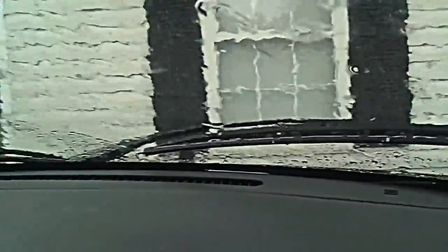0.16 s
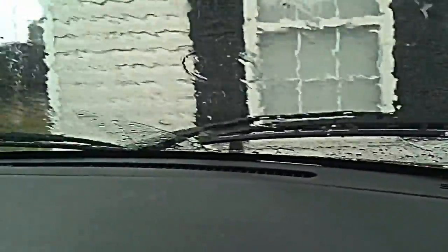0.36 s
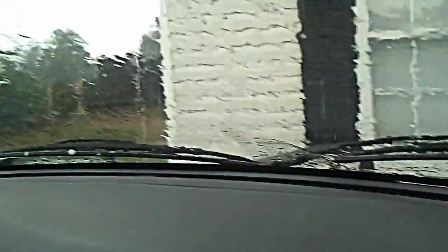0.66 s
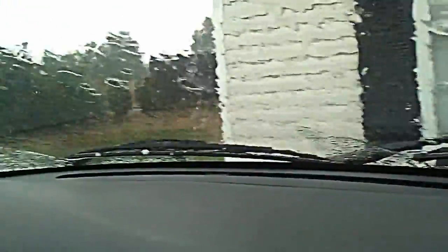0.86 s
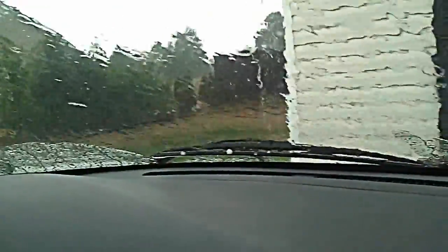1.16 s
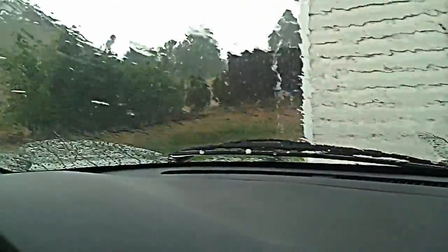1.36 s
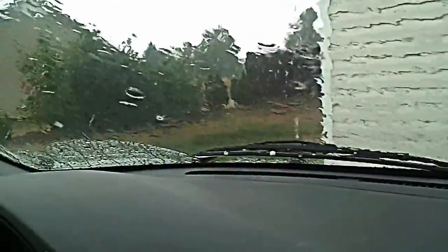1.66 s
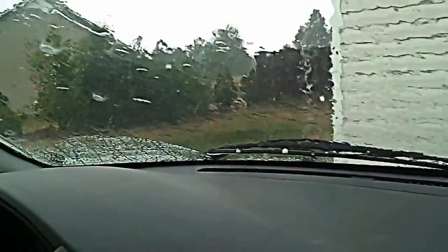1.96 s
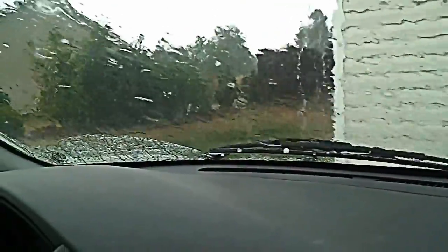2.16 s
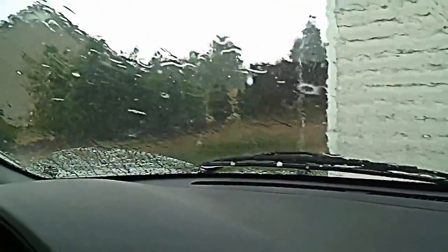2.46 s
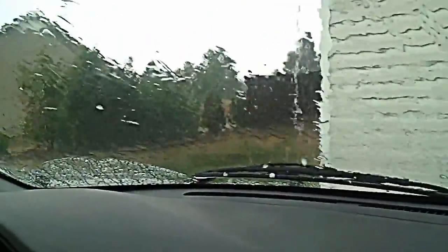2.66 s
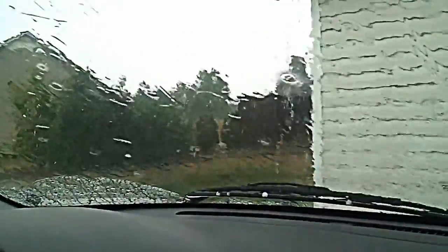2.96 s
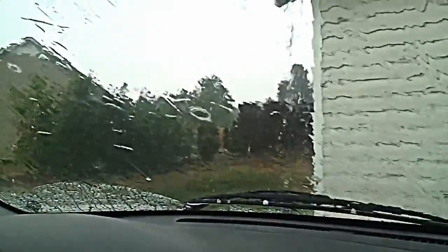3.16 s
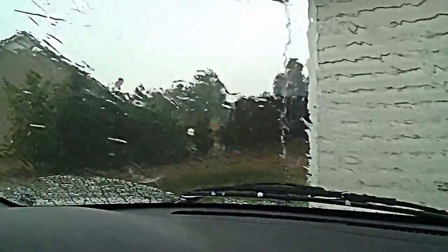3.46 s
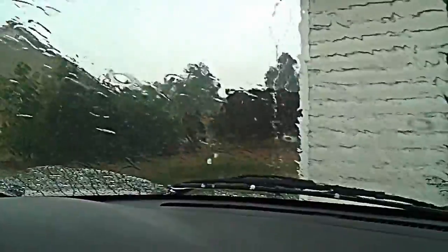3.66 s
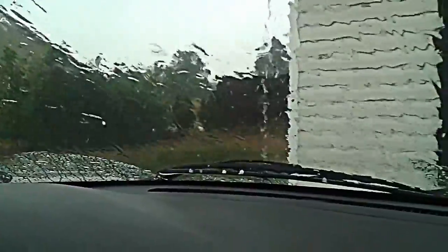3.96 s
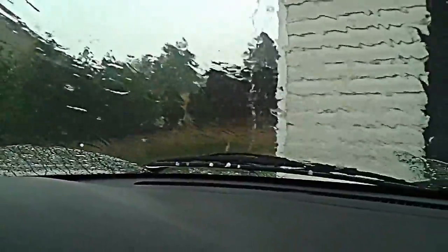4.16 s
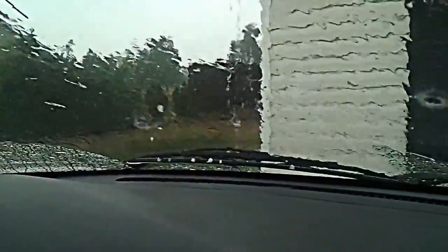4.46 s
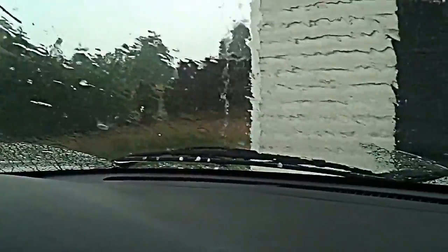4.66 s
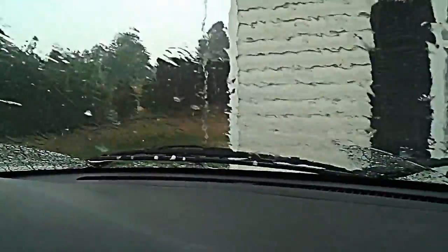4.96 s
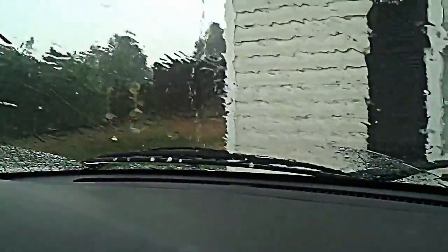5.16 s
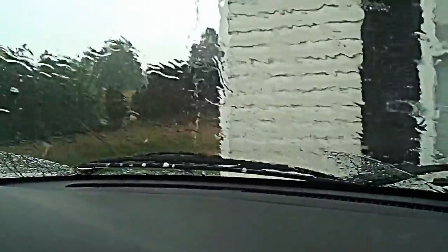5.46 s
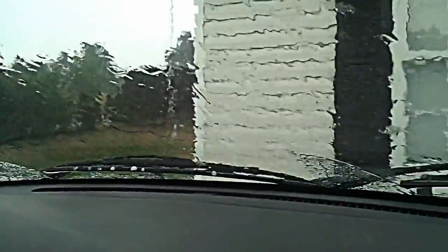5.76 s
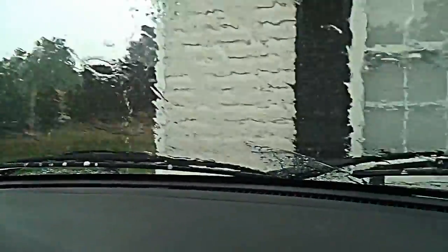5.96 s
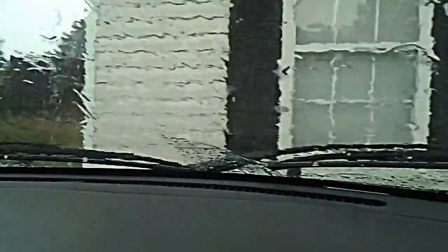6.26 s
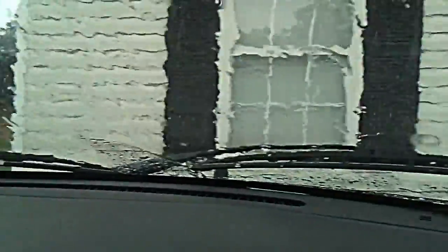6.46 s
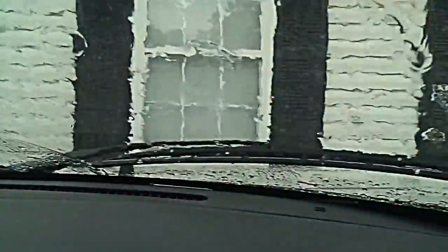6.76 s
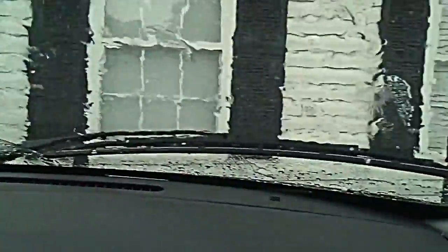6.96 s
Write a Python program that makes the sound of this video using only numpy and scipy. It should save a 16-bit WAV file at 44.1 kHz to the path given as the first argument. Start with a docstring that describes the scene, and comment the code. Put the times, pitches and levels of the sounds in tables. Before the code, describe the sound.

From start to finish, about seven seconds, heavy rain drums on the roof of a parked car and hisses on the windshield, with tiny ice grains ticking on the glass. The level swells and eases only slightly. Hailstones land on top of this at irregular intervals, several a second. Roof hits are muffled knocks with a short metal ring and a dull thump in the cabin; windshield hits are brief, brighter cracks. Strong roof blows come at about 0.2, 0.5, 1.7 and 3.6 seconds, with a quick cluster between 5.2 and 5.7 and the heaviest at 6.7. Sharp glass cracks stand out near 2.0, 2.9, 4.5 and 6.2 seconds. Everything is heard from one spot inside the closed cabin, close and boxy, through a microphone with limited treble that overloads briefly on the hardest impacts.

```python
"""Inside a parked car, in a hailstorm. Hailstones thud on the steel roof, muffled by its lining, and crack
sharply on the windshield. Heavy rain patters and hisses on both. Each impact is a bending wave, a panel ring
and a dull cabin tail; the hardest blows clip."""
import sys
import numpy as np
from scipy import signal
from scipy.fft import rfft, irfft, next_fast_len
from scipy.io import wavfile

SR = 44100
rng = np.random.default_rng(int(sys.argv[2]) if len(sys.argv) > 2 else 0)


def store_pcm(level_fs):
    """Save levels as 16-bit WAV."""
    pcm = np.round(np.clip(level_fs, -1, 1) * 32767).astype(np.int16)
    wavfile.write(sys.argv[1], SR, np.atleast_2d(pcm).T)


N = 313110

# edges of bands that decay at their own rates: (frequency [Hz])
EDGES_HZ = [20, 130, 330, 600, 1000, 1600, 2400, 3400, 4800, 6300, 9000]
BAND_HZ = np.sqrt(np.multiply(EDGES_HZ[:-1], EDGES_HZ[1:]))[:, None]
BAND_OCT = np.log2(np.maximum(BAND_HZ, 200) / 1000)
BLOW_LEN = SR // 4
AGE_S = np.arange(BLOW_LEN) / SR
BIN_HZ = np.arange(BLOW_LEN // 2 + 1) * SR / BLOW_LEN


def roof_hail(gain_db=-2.0, thump_s=0.003, t60_s=0.12, t60_doubling_db=38):
    """Stones on the lined steel roof: heavy ones ring longer; a flexing panel thumps the cabin air."""
    # (time [s], level [dB], tilt [dB/oct], swell [s], knock [Hz], panel flex [0-1])
    big_stones = [(0.001, 2, 1.8, 0.0019, 680, 1), (0.023, -0.5, 0, 0.011, 710, 0),
                  (0.040, -2.5, -4, 0.0021, 670, 0.37), (0.084, -1.5, 0, 0.0079, 3500, 0.06),
                  (0.156, 5.5, 3.5, 0.0022, 740, 1), (0.197, 1.5, -1, 0.0044, 240, .3),
                  (0.405, -2, 1, 0.0016, 2100, 0), (0.445, -3, 0.5, 0.0054, 420, 0),
                  (0.537, 7.5, 0.95, .012, 230, 1), (0.743, 0, -2, 0.0042, 1160, 0),
                  (0.942, -1, 1, 0.0038, 440, 0.1), (1.118, -4, 3.5, 0.01, 654, 0.1),
                  (1.542, 3.5, 2.3, .017, 1100, 0.33), (1.642, -7.5, 5.5, 0.012, 1950, 0),
                  (1.671, 3, 3, 0.0045, 2040, 0.18), (1.692, 8.5, 0.6, .011, 766, 0),
                  (1.839, -12.5, 7, 0.0069, 750, 0), (1.900, 0.5, -1, 0.011, 430, 0.2),
                  (1.944, 2, 2.5, 0.0086, 368, .1), (2.115, -1, 3, 0.0089, 900, 0),
                  (2.498, -4, 1, 0.013, 330, 0.3), (2.637, 0, 2, 0.017, 330, 0.05),
                  (2.781, -3, 1, 0.0023, 420, 0.1), (2.793, 3, 4.5, 0.0013, 400, .3),
                  (2.912, 3, 2.5, 0.0054, 403, 0.84), (3.143, 3.5, 4, 0.0066, 736, 0.7),
                  (3.356, -6.5, 1.5, 0.0043, 3630, 0.06), (3.440, -6.5, -3.5, 0.0048, 1420, 0.03),
                  (3.491, -1, 0, 0.017, 403, .4), (3.585, 0, 3.5, 0.0067, 467, 0.4),
                  (3.645, 7, 2, 0.0028, 430, 0.8), (3.848, -6, 4.5, 0.0044, 2400, 0.6),
                  (3.862, 3, -0.9, .004, 386, 0), (4.067, -3, 3, 0.0049, 363, 0.1),
                  (4.137, -6, 0, 0.0053, 680, 0.3), (4.258, -5, 4.5, 0.004, 494, 0),
                  (4.553, 6, 2, .010, 330, 0.4), (4.629, -7, -3.5, 0.0018, 380, 0),
                  (4.763, -5.5, -3, 0.0067, 960, 0), (5.041, -7, 3.5, 0.012, 2400, .4),
                  (5.200, 7, 3, .005, 510, 0), (5.230, 4, 3, .003, 416, 0), (5.296, 3, 2.5, .015, 384, 0.4),
                  (5.342, 6.5, 2.5, .005, 440, .7), (5.723, 8.5, 2.45, 0.0089, 1150, 0.2),
                  (5.771, -1, -2.5, 0.01, 400, 0), (5.805, -7, 6, 0.0057, 330, 0.1),
                  (5.880, -6, 0.5, 0.014, 1600, 0.03), (6.017, -4.5, -2, .012, 1070, 0.04),
                  (6.093, -3, 0.5, 0.0089, 330, 0), (6.285, 4.5, 0.9, .010, 1480, 0.5),
                  (6.363, -4.5, 0, 0.0073, 2500, 0.12), (6.483, -6.5, 2.5, 0.0075, 410, 0.2),
                  (6.576, -7, 0.5, .017, 2880, 0), (6.661, -3.5, -1, 0.022, 670, 0),
                  (6.746, 12.5, 3, 0.0057, 600, 0.3)]
    # roof response in the cabin: (frequency [Hz], gain [dB])
    roof_tone = [(30, -35), (80, -32), (125, -11.5), (175, -6.5), (290, -10), (400, 0.5), (720, -4.5),
                 (1100, -9), (1400, -11.5), (1900, -9), (2600, -14), (3500, -15.5), (5600, -22.5),
                 (8000, -27)]
    # pressure follows the dent's acceleration: one push, one pull
    thump = AGE_S / thump_s * (2 - AGE_S / thump_s) * np.exp(-AGE_S / thump_s)
    out = np.zeros(N)
    for time_s, db, tilt_db, swell_s, knock_hz, flex in big_stones + small_stones():
        ring_s = t60_s * 2 ** (db / t60_doubling_db)
        ring = blow(db + tilt_db * BAND_OCT, swell_s, ring_s, first_share=0.06, travel_s=0.000331)
        add(out, knock(ring, knock_hz) + flex * from_db(db) * thump, time_s)
    return from_db(gain_db) * colour(out, roof_tone)


def small_stones(count=100, per_s=6, swell_s=0.0087, low_hz=330, high_hz=1990):
    """Rows of random roof hits: sizes follow the storm, too light to flex the panel."""
    times_s = np.cumsum(rng.uniform(0.2, 1.8, count)) / per_s
    size, hardness = rng.standard_normal((count, 2)).T
    levels_db = -10.5 + downpour_db(times_s) + 3.5 * size
    tilts_db = 2.5 + 1.5 * hardness
    knocks_hz = low_hz * (high_hz / low_hz) ** rng.random(count)
    stones = zip(times_s, levels_db, tilts_db, knocks_hz)
    return [(s, db, tilt_db, swell_s, hz, 0) for s, db, tilt_db, hz in stones if s < (N - 1) / SR]


def knock(x, hz, lift_db=7.5, q=4):
    """The mode under the point of impact rings above the others."""
    mode = signal.lfilter(*signal.iirpeak(hz, q, fs=SR), x)
    return x + (from_db(lift_db) - 1) * mode


def glass_hail(ping_width_oct=0.52, t60_s=0.057, t60_doubling_db=25):
    """Stones on the bare windshield: short cracks, each with a ping set by size and landing place."""
    # (time [s], level [dB], tilt [dB/oct], swell [s], ping [Hz], ping lift [dB])
    stones = [(0.288, -1.5, 1, .0005, 3860, -6.5), (1.005, -7.5, 2.2, .001, 2960, -4),
              (1.987, 7, 0.5, .004, 8650, 13), (2.033, -3.5, 1, .0015, 3030, -1),
              (2.355, -4, 2.5, .0008, 3120, -8), (2.460, 0.5, 1.5, 0.00066, 4400, 6),
              (2.609, -7.5, 6, .0007, 2270, 8.5), (2.756, -15, 5, 0.00095, 3800, -2),
              (2.856, -22, 6, 0.0011, 5370, 2.5), (2.931, -4.5, -0.5, .0015, 7380, 20),
              (2.939, 3.5, 1.3, .001, 1820, 4.5), (4.114, -20, 1.5, 0.0055, 3830, 12.5),
              (4.532, 8, 0.6, .003, 5850, 6.5), (4.852, -11.5, 2.5, .001, 2960, -9),
              (4.98, -8.5, 7, 0.0053, 3060, 8), (5.413, -15.5, 4.5, .001, 5240, -2),
              (5.495, 0.5, 4.5, 0.0013, 7700, 1), (5.942, -6, -1.5, 0.0031, 2490, 7),
              (6.196, 2.5, 1.9, .002, 3200, 1.5), (6.796, -7.5, 3.5, .001, 4560, -1)]
    # windshield response in the cabin: (frequency [Hz], gain [dB])
    glass_tone = [(30, -37.5), (100, -9), (170, -9.5), (400, -1.4), (800, -7), (1400, -9.5), (1900, -6.5),
                  (2600, -11), (3500, -7), (4800, -11), (6000, -17), (8000, -24)]
    out = np.zeros(N)
    for time_s, db, tilt_db, swell_s, ping_hz, ping_db in stones:
        ping_shape = np.exp(-(np.log2(BAND_HZ / ping_hz) / ping_width_oct) ** 2)
        bands_db = db + tilt_db * BAND_OCT + ping_db * ping_shape
        ring_s = t60_s * 2 ** (db / t60_doubling_db)
        crack = blow(bands_db, swell_s, ring_s, first_share=0.23, travel_s=0.0004,
                     tail_db=-14.5, tail_t60_s=0.18)
        add(out, crack, time_s)
    return colour(out, glass_tone)


def rain(gain_db=-21.5, swing_share=0.51, patter_db=-4.0, spray_db=-13, tick_db=-16):
    """Big drops drum on the roof, fine spray hisses, ice grains tick on the glass."""
    # responses to drops and to spray: (frequency [Hz], gain [dB])
    patter_tone = [(30, -57.5), (75, -28), (120, -8.5), (172, -4.5), (270, -6.5), (410, 3.5), (750, -1.5),
                   (1150, -5), (1400, -7.5), (1900, -5.5), (2700, -14), (3500, -18), (5500, -25.5),
                   (8000, -27.5)]
    spray_tone = [(300, -13.5), (1200, -7.5), (1900, -4), (2700, -4.5), (3600, 1.5), (5500, -8.5),
                  (8000, -13.5)]
    drops = shower(per_s=400, spread_db=4.0, swell_s=0.00287, t60_s=0.13, first_share=0.083, spots=10)
    spray = shower(per_s=1900, spread_db=7.0, swell_s=0.0015, t60_s=0.016, first_share=0.12, spots=4)
    ticks = shower(per_s=30, spread_db=5, swell_s=0.0005, t60_s=0.012, first_share=0.6, spots=8)
    patter = from_db(patter_db) * rms_one(colour(drops, patter_tone))
    hiss = colour(from_db(spray_db) * rms_one(spray) + from_db(tick_db) * rms_one(ticks), spray_tone)
    return from_db(gain_db + swing_share * downpour_db(np.arange(N) / SR)) * (patter + hiss)


def shower(per_s, spread_db, swell_s, t60_s, first_share, spots):
    """Impacts of random size and time on spots from dull to bright, each with its own ring."""
    out = np.zeros(N)
    for tilt_db in np.linspace(-2, 2, spots):
        sizes = from_db(spread_db * np.clip(rng.standard_normal(N), -2, 2))
        signs = rng.choice([-1, 1], N)
        landings = rng.random(N) < per_s / spots / SR
        ring = blow(tilt_db * BAND_OCT, swell_s, t60_s, first_share, travel_s=0.000416)
        out += signal.oaconvolve(sizes * signs * landings, rms_one(ring))[:N]
    return out


def downpour_db(time_s):
    """Storm strength about its mean; it swells and eases a little."""
    # (time [s], level [dB])
    strength = [(0.0, -28.5), (0.28, -31), (0.79, -34), (0.99, -30), (1.4, -31.5), (1.94, -30), (2.33, -31),
                (2.51, -29.5), (3.74, -32.5), (5.36, -30), (5.61, -32.5), (6.19, -28), (6.62, -30.5),
                (7.1, -29)]
    times_s, db = np.transpose(strength)
    return np.interp(time_s, times_s, db - db.mean())


def blow(bands_db, swell_s, t60_s, first_share, travel_s,
         damping=0.3, tail_db=-15, tail_tilt_db=-4, tail_t60_s=0.37):
    """One impact: first wave, swell as it spreads over the panel, panel ring, dull cabin tail."""
    swell = np.minimum(AGE_S / swell_s, 1)
    decay_s = np.maximum(AGE_S - swell_s, 0)
    panel = np.exp(-np.log(1000) * decay_s / t60_s * 2 ** (damping * BAND_OCT))
    tail = from_db(tail_db + tail_tilt_db * BAND_OCT) * np.exp(-np.log(1000) * decay_s / tail_t60_s)
    gains = from_db(bands_db)
    ring = dense_modes(gains * swell * np.sqrt((1 - first_share) * panel ** 2 + tail ** 2))
    panel_energy = np.sum((swell * panel) ** 2, axis=1, keepdims=True)
    first = bending_wave(gains * np.sqrt(first_share * panel_energy), travel_s)
    return ring + np.pad(first, (int(swell_s * SR / 2), 0))[:BLOW_LEN]


def bending_wave(gains, travel_s):
    """First wave from the impact: speed grows as the root of frequency, so the treble leads."""
    delay_s = travel_s * np.sqrt(BAND_HZ[-1] / np.maximum(BIN_HZ, BAND_HZ[1]))
    phase = 2 * np.pi * np.cumsum(delay_s) * SR / BLOW_LEN
    return irfft(np.interp(BIN_HZ, BAND_HZ[:, 0], gains[:, 0]) * np.exp(-1j * phase), BLOW_LEN)


def dense_modes(envelopes):
    """Countless panel modes beat like noise; each band carries the energy of its envelope."""
    band_of_bin = np.searchsorted(EDGES_HZ, BIN_HZ) - 1
    masks = band_of_bin == np.arange(len(BAND_HZ))[:, None]
    rings = envelopes * irfft(rfft(rng.standard_normal(BLOW_LEN)) * masks, BLOW_LEN)
    energy = np.sum(envelopes ** 2, axis=1) * np.diff(EDGES_HZ) / (SR / 2)
    return np.sqrt(energy / (np.sum(rings ** 2, axis=1) + 1e-20)) @ rings


def colour(x, tone):
    """Minimum-phase filter: a panel's tone plus the cabin resonances."""
    # cabin and panel resonances: (centre [Hz], width [Hz], lift [dB])
    modes = [(170.4, 14, 6), (229, 18, -0.5), (440, 36, 0.5), (487, 15, 1), (735, 100, 3.5),
             (1123, 190, 4.5), (1442, 85, 3.5), (1880, 140, 1.5), (3490, 470, 1.5), (6900, 110, 6)]
    size = 2 * next_fast_len(N // 2 + BLOW_LEN)
    hz = np.maximum(np.arange(size // 2 + 1) * SR / size, 1)
    points_hz, points_db = np.transpose(tone)
    db = np.interp(np.log(hz), np.log(points_hz), points_db)
    db += sum(lift / (1 + (2 * (hz - centre) / width) ** 2) for centre, width, lift in modes)
    # cepstrum folded onto positive time: same gains, nothing sounds early
    cepstrum = irfft(np.log(from_db(db)))[:size // 2]
    cepstrum[1:] *= 2
    return irfft(rfft(x, size) * np.exp(rfft(cepstrum, size)))[:N]


def from_db(db):
    """Decibels to gain."""
    return 10 ** (np.asarray(db) / 20)


def rms_one(x):
    """Scale to unit rms."""
    return x / np.sqrt(np.mean(x ** 2) + 1e-20)


def add(track, sound, time_s):
    """Mix a sound into a track from time_s on."""
    start = round(time_s * SR)
    track[start:start + len(sound)] += sound[:N - start]


def scene():
    """Rain and hail at one spot in the cabin, mono."""
    return (rain() + glass_hail() + roof_hail())[None]


def record(dry, overload=0.88, band_top_hz=8100, cutoff_hz=17000):
    """The hardest blows clip; the sound is narrowed to below about 8 kHz, bright cracks overshoot in that
    filter and clip again."""
    band_filter = signal.ellip(14, 0.1, 90, band_top_hz, fs=SR, output="sos")
    output_filter = signal.cheby2(12, 70, cutoff_hz, fs=SR, output="sos")
    narrow = signal.sosfilt(band_filter, np.clip(dry, -overload, overload))
    return signal.sosfilt(output_filter, np.clip(narrow, -1, 1))


dry = scene()
out = record(dry)
store_pcm(out)
```